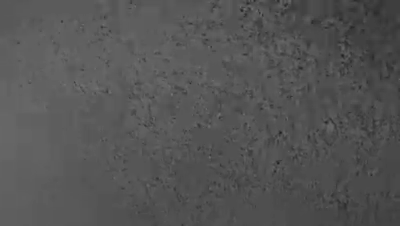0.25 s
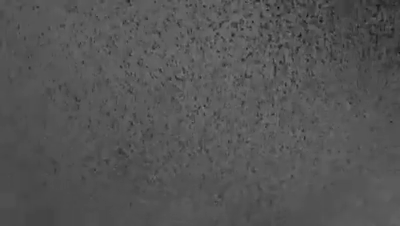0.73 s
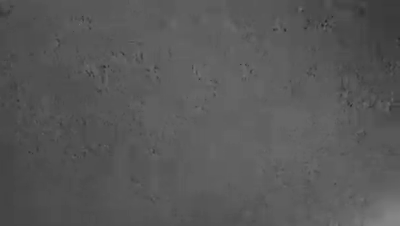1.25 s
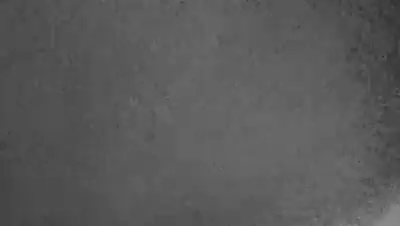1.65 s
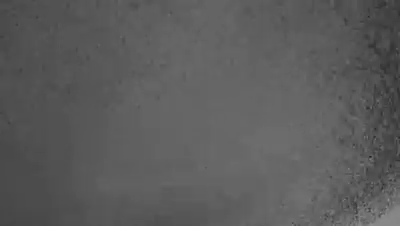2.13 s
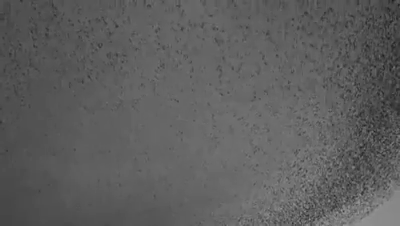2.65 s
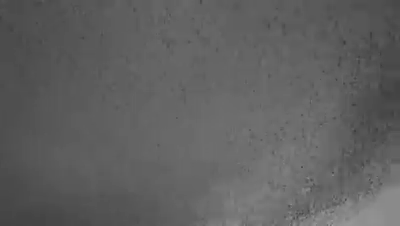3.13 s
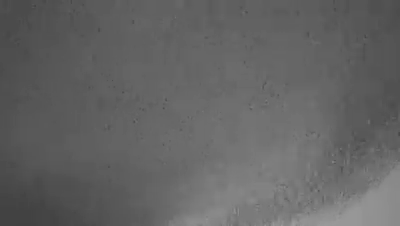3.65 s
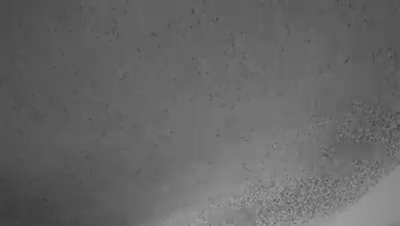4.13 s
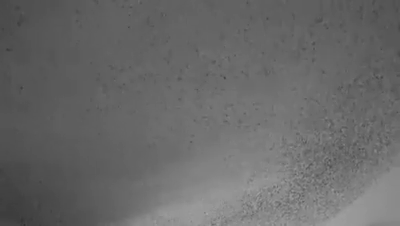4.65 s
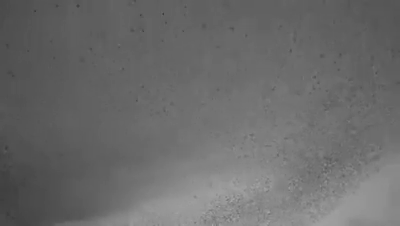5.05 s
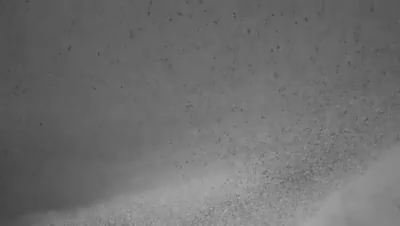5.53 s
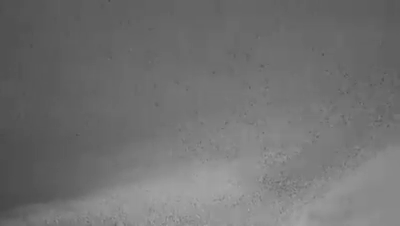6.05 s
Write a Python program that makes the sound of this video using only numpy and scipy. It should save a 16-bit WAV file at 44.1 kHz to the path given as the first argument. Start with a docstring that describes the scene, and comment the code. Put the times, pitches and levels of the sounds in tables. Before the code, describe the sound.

From the first instant a dense rush of countless small wings fills the air, at its fullest until about 1 second. It is a broad, breathy roar of pushed air and rustling feathers, with little deep bass, lightly ruffled by fast puffs and swishes from the nearest birds. Faint high twitter runs throughout. A rasp and a hard, bright chip come close together near 0.75 s, another hoarse rasp at 1.4 s, then a cluster around 2.0-2.3 s. More short rasps follow between 2.5 and 3.4 s, with sharp chips around 3.3 s and a lower, clear one at 3.8 s. Chips flick at 4.15 s and small ticks near 4.6 s. From 5 to 6.3 s calls overlap, softer and longer, while the wing rush grows gentler and duller, still present at the end. Open outdoors, dry, mono and centred.

```python
"""A huge flock of starlings streams close overhead in open country and slowly draws away.
Wings: shaped noise, an even rush from the mass plus puffs and feather swishes from the nearest birds.
Bursts: short bright noise bursts, some giving the sharp chips their hard attack.
Calls: tones broken into rasps by random modulation, near ones with a short scattered tail, far ones faint.
The microphone is mono (both channels alike), with a steep bass cut and an upper band limit."""
import sys
import numpy as np
from scipy import signal
from scipy.fft import rfft, irfft, next_fast_len
from scipy.io import wavfile
from scipy.ndimage import uniform_filter1d, map_coordinates

SR = 44100
rng = np.random.default_rng(int(sys.argv[2]) if len(sys.argv) > 2 else 0)


def transcribe(u):
    """Save the signal u as a 16-bit wav file named by the first command-line argument.

    u: samples, shape (n,) or (channels, n), limited to [-1, 1]; the rate is SR.
    q: integer samples, one column per channel.
    """
    v = np.clip(np.atleast_2d(u).T, -1, 1)
    q = np.round(v * 32767).astype(np.int16)
    wavfile.write(sys.argv[1], SR, q)


N = 277830

# Flock drawing away: (time [s], pushed air level [dB], feather rustle level [dB], feather hiss level [dB])
FLOCK_LEVELS = [(0, -18, -18.5, -35.5), (0.8, -18, -18.5, -35), (1.4, -18.7, -19, -37),
                (2.0, -19.5, -20, -39.5), (2.75, -19, -20, -40.6), (3.15, -20.5, -19.5, -41.5),
                (3.75, -20.5, -19.5, -41.5), (3.95, -21.5, -20, -42), (5.25, -22.5, -21, -42),
                (5.85, -24.5, -21, -43.5), (6.3, -24.5, -22.4, -46.5)]
# Air pushed by the wings: (frequency [Hz], relative density [dB per Hz])
AIR_SPECTRUM = [(120, -90), (200, -16.5), (262, -9), (346, -3.5), (489, -0.5), (777, -1.5), (992, -1),
                (1500, -6), (1950, -45), (3300, -120)]
# Feather rustle: (frequency [Hz], relative density [dB per Hz])
RUSTLE_SPECTRUM = [(700, -44), (1300, -6.5), (1600, 0.46), (2000, 0), (2650, 0.3), (3400, -3), (4300, -3.5),
                   (4550, -7), (5800, -9.5), (6700, -14.5), (8800, -22.5), (9400, -32), (12000, -64)]
# Feather hiss: (frequency [Hz], relative density [dB per Hz])
HISS_SPECTRUM = [(2500, -27), (5000, 0), (7000, 5), (8800, 3.5), (10000, 1), (12000, -4.5), (14800, -9.5)]
# Short bright noise bursts: (time [s], length, twice the rise [s], level once that length has passed [dB])
BURST_EVENTS = [(.7585, .002, -19), (2.453, .01, -34), (3.263, .005, -26), (4.562, .005, -33),
                (5.286, .003, -27)]
# Bright noise burst: (frequency [Hz], relative density [dB per Hz])
BURST_SPECTRUM = [(1200, -24), (3000, 0), (6000, 5), (8500, 5), (11000, -27), (14500, -22)]
# Swelling near rasps: (time [s], length [s], mid pitch [Hz], rasp width [Hz], level [dB])
RASP_EVENTS = [(0.724, 0.068, 4800, 516, -23.7), (1.401, 0.086, 6280, 343, -22.5),
               (1.945, 0.06, 7950, 310, -40), (2.034, 0.054, 5070, 782, -24),
               (2.194, 0.1, 4850, 562, -22.5), (2.507, 0.12, 5550, 430, -31),
               (2.759, 0.082, 4850, 380, -28), (3, 0.065, 5180, 787, -23.5), (3.06, 0.05, 5800, 310, -31),
               (3.24, 0.025, 5140, 640, -25.5), (3.333, 0.032, 7800, 250, -37),
               (3.546, 0.08, 6800, 430, -37), (3.712, 0.13, 8360, 298, -40), (4.097, 0.14, 7800, 340, -36),
               (4.24, 0.102, 5970, 570, -31), (4.535, 0.049, 3820, 100, -28.5),
               (4.589, 0.19, 7960, 230, -38.5), (4.781, 0.16, 6370, 229, -34),
               (5.047, 0.092, 5570, 250, -28), (5.065, 0.11, 7400, 500, -35.5),
               (5.237, 0.12, 5180, 540, -29), (5.27, 0.21, 8650, 380, -40.5), (5.528, 0.18, 5660, 280, -29),
               (5.672, 0.18, 7160, 486, -32.5), (5.722, 0.2, 5400, 434, -30),
               (5.97, 0.14, 6940, 400, -32.5), (6.21, 0.12, 7800, 360, -35)]
# Sharp near chips: (time [s], pitch [Hz], rasp width [Hz], level [dB])
CHIP_EVENTS = [(0.756, 7860, 520, -28), (3.262, 7600, 563, -29), (3.362, 6720, 530, -29),
               (3.782, 4280, 227, -21.5), (4.141, 7700, 630, -31), (4.16, 6360, 330, -26.5),
               (4.561, 8500, 270, -38), (4.728, 8630, 190, -38), (5.025, 6900, 650, -29)]

RASP_RISE_SHARE, RASP_FALL_SHARE = 0.41, 0.03  # of the length; of the mid pitch
CHIP_LENGTH_S, CHIP_RISE_SHARE = 0.037, 0.05
BASS_CUT_HZ, BAND_LIMIT_HZ = 263, 14850


def amp(db):
    """Decibels to gain."""
    return 10 ** (np.asarray(db) / 20)


def unit(x):
    """Scale to rms 1."""
    return x / np.sqrt(np.mean(x ** 2) + 1e-20)


def curves(rows):
    """One value per sample for each column after the time."""
    time_s, *columns = np.transpose(rows)
    return [np.interp(np.arange(N) / SR, time_s, column) for column in columns]


def wobble(knots_per_s, size):
    """A smooth random curve through Gaussian knots."""
    knots = rng.standard_normal(8192)
    return map_coordinates(knots, [np.arange(size) * knots_per_s / SR], mode="wrap")


def filtered(x, response):
    """Multiply the spectrum of x by a response of frequency."""
    fft_size = next_fast_len(N + SR // 4)
    gain = response(np.fft.rfftfreq(fft_size, 1 / SR))
    return irfft(rfft(x, fft_size) * gain, fft_size)[:N]


def add(track, start_s, sound):
    """Mix a sound into the track in place."""
    part = track[max(round(start_s * SR), 0):][:len(sound)]
    part += sound[:len(part)]


def turbulence(spectrum, patchy_db):
    """Coloured noise of rms 1 whose colour shifts in random patches."""
    bins = signal.stft(rng.standard_normal(N), nperseg=512)[2]
    patches = uniform_filter1d(rng.standard_normal(bins.shape), size=8, axis=0)  # across frequency
    patches = uniform_filter1d(patches, size=11, axis=1)  # across time
    noise = signal.istft(bins * amp(patchy_db * unit(patches)), nperseg=512)[1][:N]
    hz, db = np.transpose(spectrum)
    return unit(filtered(noise, lambda f: amp(np.interp(np.log(f + 1), np.log(hz), db))))


def wings():
    """Downstrokes push air in low puffs; on the upstroke the feathers slide and hiss."""
    air_db, rustle_db, hiss_db = curves(FLOCK_LEVELS)
    down, up = near_wings(beat_hz=13, pass_s=0.29, sharpness=8.1, count=60)
    air = amp(air_db) * wing_noise(AIR_SPECTRUM, down, near_share=0.14, patchy_db=0.22)
    both = (down + up) / 2
    rustle = amp(rustle_db) * wing_noise(RUSTLE_SPECTRUM, both, near_share=0.19, patchy_db=1.02)
    hiss = amp(hiss_db) * wing_noise(HISS_SPECTRUM, up, near_share=0.22, patchy_db=1.1)
    return air + rustle + hiss


def near_wings(beat_hz, pass_s, sharpness, count):
    """Power of the down- and upstrokes of single birds, each flapping at its own pace as it passes."""
    t = np.arange(0, N, 32) / SR
    delay, phase, pace = rng.uniform(0, 1, (count, 3)).T[..., None]
    closest_s = (np.arange(count)[:, None] + delay) / count * N / SR
    nearness = 1 / (1 + ((t - closest_s) / pass_s) ** 2) ** 2
    bird_beat_hz = beat_hz * np.exp(0.5 * (pace - 0.5))
    swing = np.cos(2 * np.pi * (bird_beat_hz * t + phase))
    strokes = []
    for direction in (1, -1):  # down, up
        power = np.sum(nearness * np.exp(sharpness * (direction * swing - 1)), axis=0)
        power /= uniform_filter1d(power, size=700)  # level against the mean over about 0.5 s
        strokes.append(np.interp(np.arange(N) / SR, t, power))
    return strokes


def wing_noise(spectrum, strokes, near_share, patchy_db):
    """The even rush of the distant mass plus the puffs of the near birds, shared by power."""
    return turbulence(spectrum, patchy_db) * np.sqrt(1 - near_share + near_share * strokes)


def bright_bursts():
    """A noise burst that rises fast and dies away, at times on the onset of a chip."""
    envelope = np.zeros(N)
    t = np.arange(SR // 20) / SR
    for start_s, length_s, db in BURST_EVENTS:
        add(envelope, start_s, amp(db) * (t / length_s) * np.exp(2 - 2 * t / length_s))
    return envelope * turbulence(BURST_SPECTRUM, patchy_db=2)


def near_calls(scatter_db=-9, scatter_s=0.014):
    """Close birds rasp, sagging in pitch, or chip abruptly; the bodies around scatter a short, faint tail."""
    track = np.zeros(N)
    for start_s, length_s, hz, width_hz, db in RASP_EVENTS:
        start_hz, end_hz = hz * (1 + RASP_FALL_SHARE / 2), hz * (1 - RASP_FALL_SHARE / 2)
        add(track, start_s, amp(db) * rasp(length_s, start_hz, end_hz, width_hz, RASP_RISE_SHARE))
    for start_s, hz, width_hz, db in CHIP_EVENTS:
        add(track, start_s, amp(db) * rasp(CHIP_LENGTH_S, hz, hz, width_hz, CHIP_RISE_SHARE))
    t = np.arange(SR // 8) / SR
    tail = rng.standard_normal(len(t)) * np.exp(-t / scatter_s)
    tail /= np.linalg.norm(tail)
    return track + amp(scatter_db) * signal.fftconvolve(track, tail)[:N]


def rasp(length_s, start_hz, end_hz, width_hz, rise_share,
         buzz_hz=170, buzz_depth=0.16, warble_hz=170, core=0.76):
    """A gliding syrinx tone that chaotic vibration breaks into a rasp, pulsed by a fast buzz; rms 1."""
    size = int(length_s * SR)
    u = np.arange(size) / size
    pitch_hz = start_hz + (end_hz - start_hz) * u + warble_hz * wobble(67.8, size)

    def shake(knots_per_s):
        return wobble(knots_per_s, size) + 1j * wobble(knots_per_s, size)

    # slow unsteadiness makes the whistling core, fast unsteadiness its hoarse skirt
    chaos = core * shake(2 * width_hz) + shake(4.8 * width_hz)
    voice = np.real(chaos * np.exp(2j * np.pi * np.cumsum(pitch_hz) / SR))
    buzz_rate_hz = buzz_hz * (1 + 0.23 * wobble(60, size))
    buzz = 1 + buzz_depth * np.sin(2 * np.pi * np.cumsum(buzz_rate_hz) / SR)
    shape = np.sqrt(np.minimum(u / rise_share, (1 - u) / (1 - rise_share)))
    return unit(shape * buzz * voice)


def far_calls(level_db, centre_hz, count):
    """Faint chatter from deep in the flock; the air takes more from the higher calls."""
    track = np.zeros(N)
    for when, high, long, glide, loud in rng.uniform(-1, 1, (count, 5)):
        start_hz = centre_hz * np.exp(0.35 * high)
        end_hz = start_hz * np.exp(0.084 * glide)
        length_s = 0.079 * np.exp(0.5 * long)
        call = rasp(length_s, start_hz, end_hz, width_hz=339, rise_share=0.4)
        call_db = level_db + 1.7 * loud - 9.4 * high
        add(track, (when + 1) / 2 * N / SR, amp(call_db) * call)
    return track


def scene():
    """Wings, bursts and calls in the open air, the same in both channels."""
    flock = wings() + bright_bursts() + near_calls() + far_calls(level_db=-38.5, centre_hz=6084, count=120)
    return np.array([flock, flock])


def record(dry):
    """The microphone cuts the bass steeply and keeps nothing above its band limit."""
    def response(hz):
        return (hz < BAND_LIMIT_HZ) / np.sqrt(1 + (BASS_CUT_HZ / (hz + 1)) ** 12)

    return np.array([filtered(channel, response) for channel in dry])


dry = scene()
out = record(dry)
transcribe(out)
```